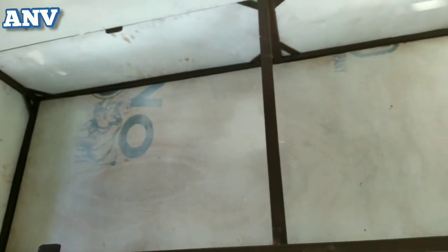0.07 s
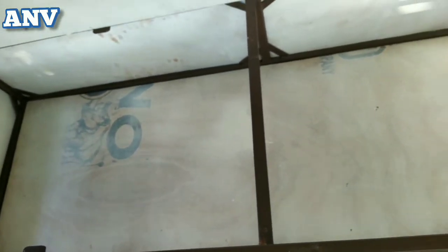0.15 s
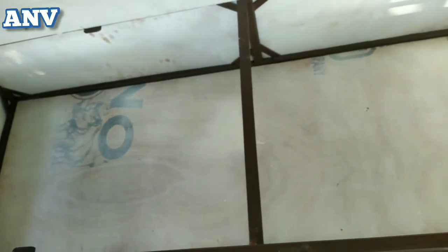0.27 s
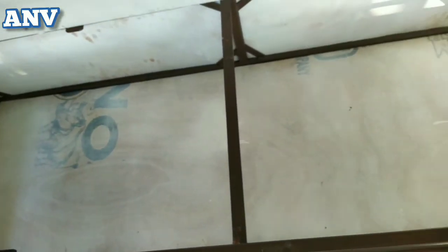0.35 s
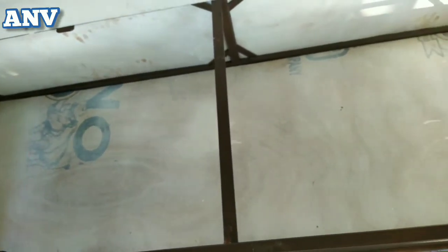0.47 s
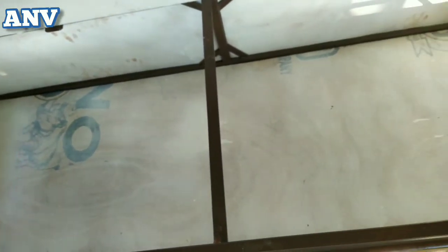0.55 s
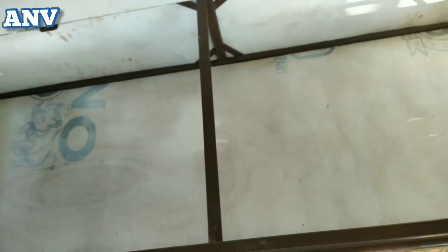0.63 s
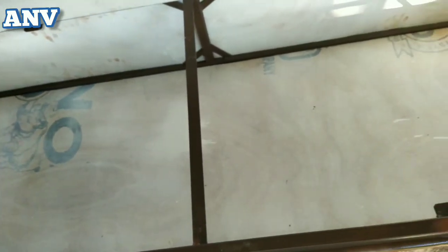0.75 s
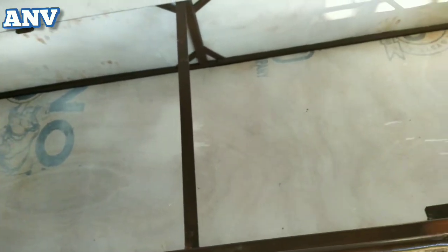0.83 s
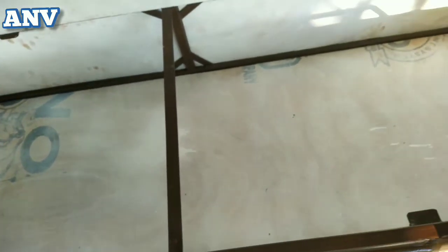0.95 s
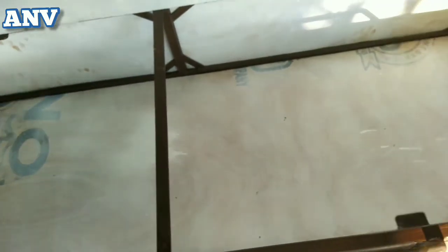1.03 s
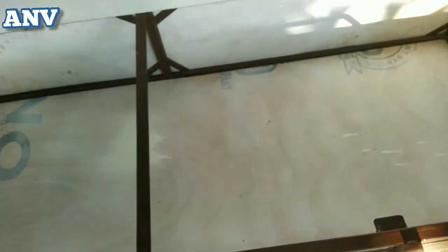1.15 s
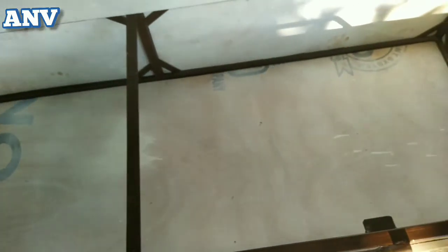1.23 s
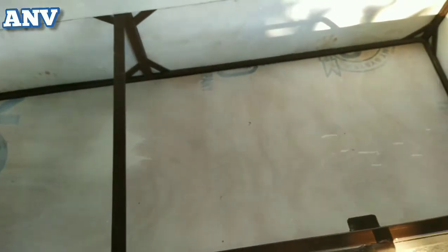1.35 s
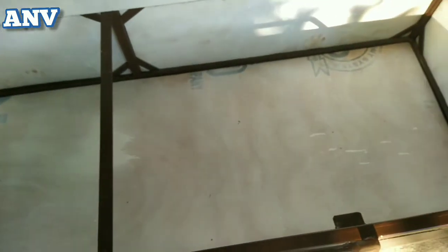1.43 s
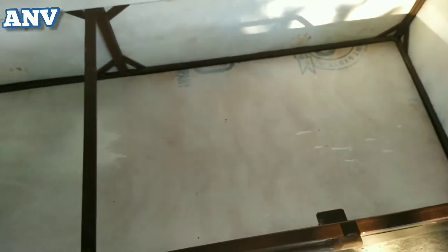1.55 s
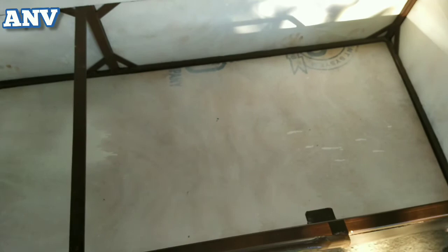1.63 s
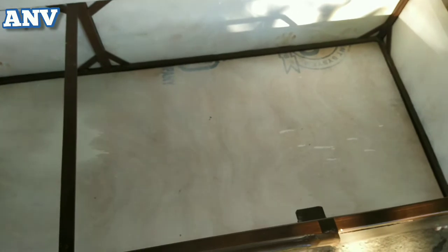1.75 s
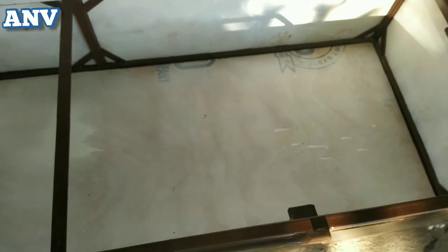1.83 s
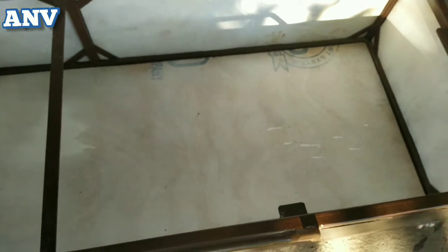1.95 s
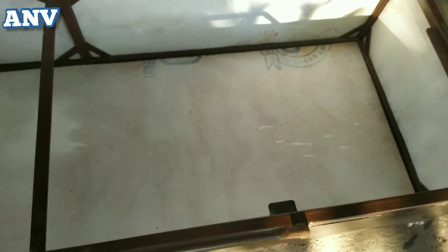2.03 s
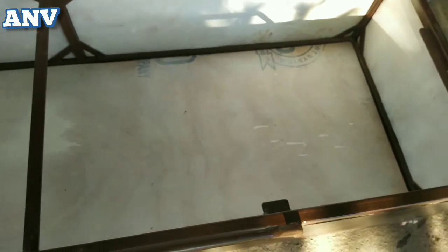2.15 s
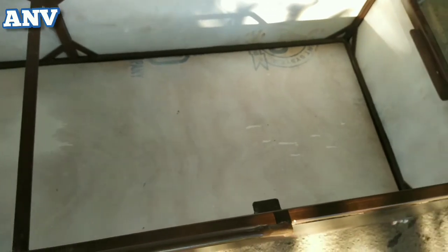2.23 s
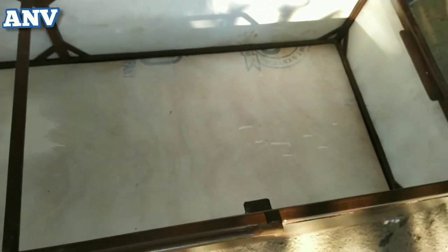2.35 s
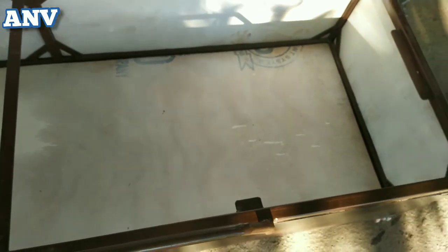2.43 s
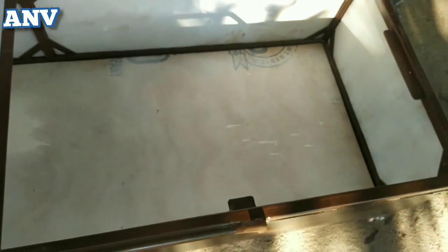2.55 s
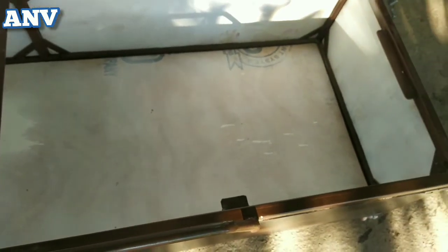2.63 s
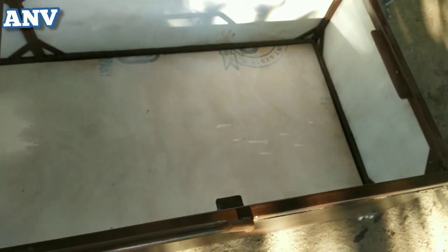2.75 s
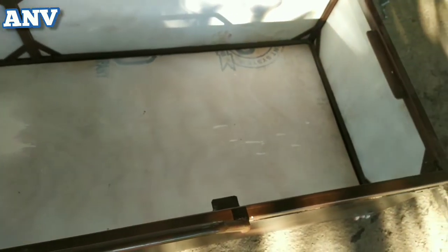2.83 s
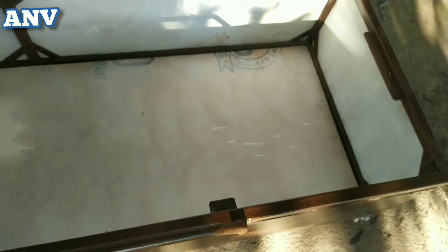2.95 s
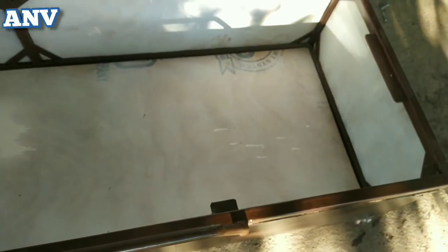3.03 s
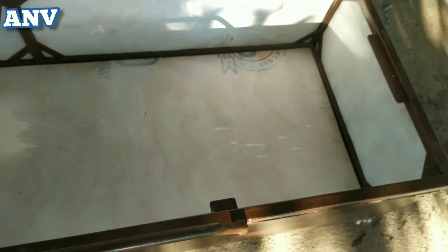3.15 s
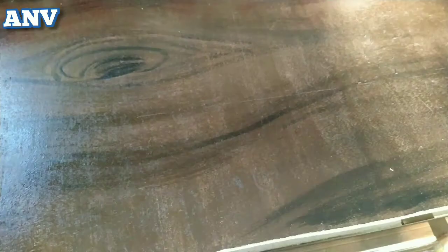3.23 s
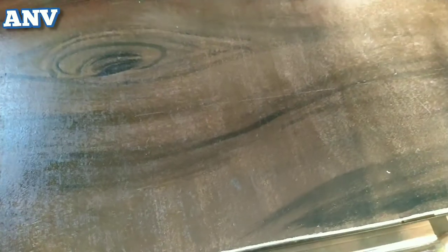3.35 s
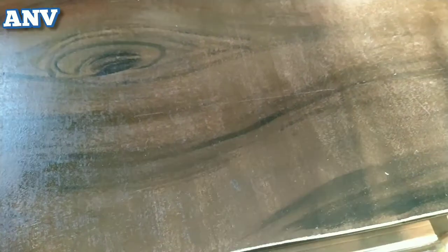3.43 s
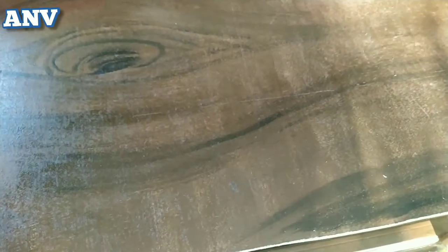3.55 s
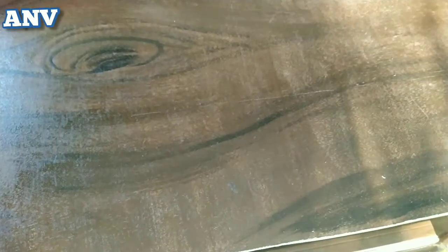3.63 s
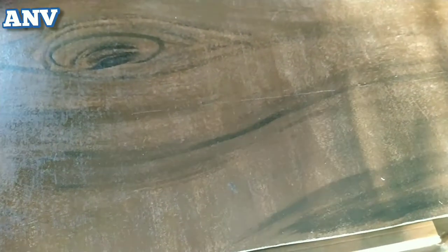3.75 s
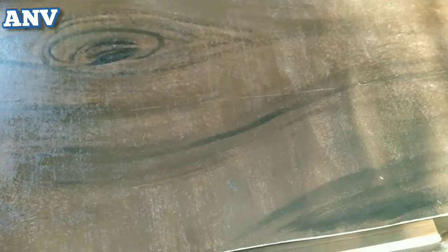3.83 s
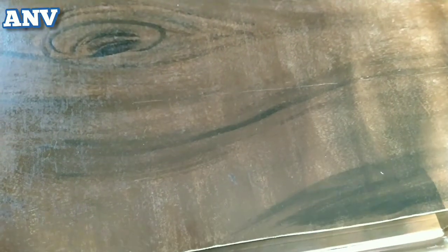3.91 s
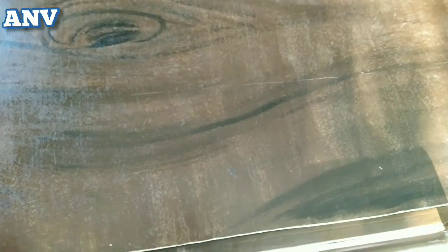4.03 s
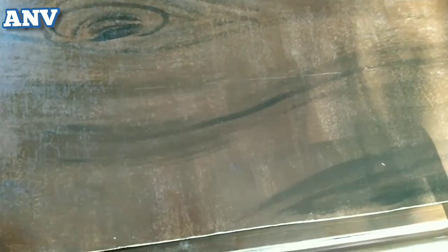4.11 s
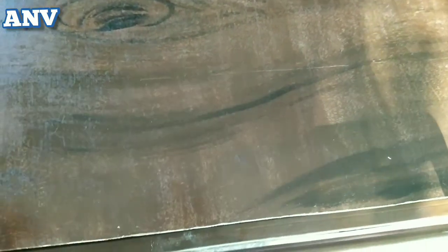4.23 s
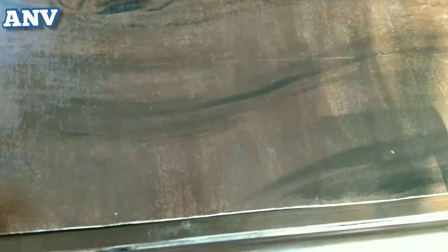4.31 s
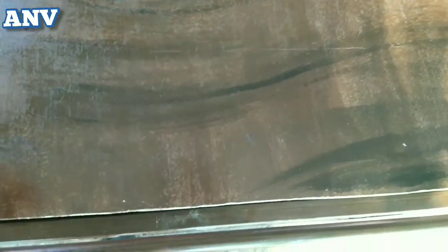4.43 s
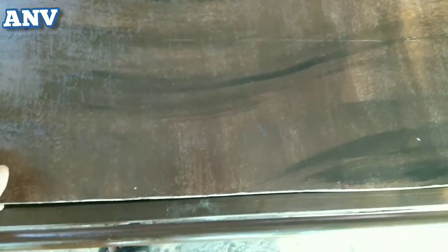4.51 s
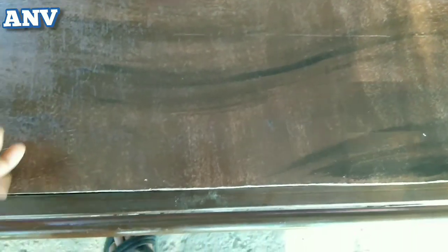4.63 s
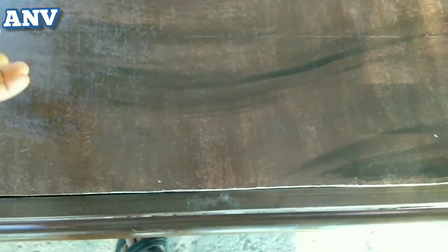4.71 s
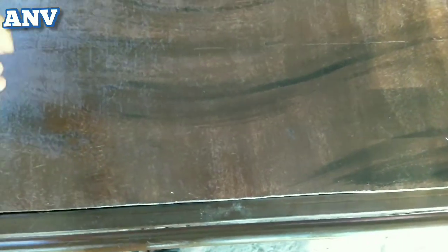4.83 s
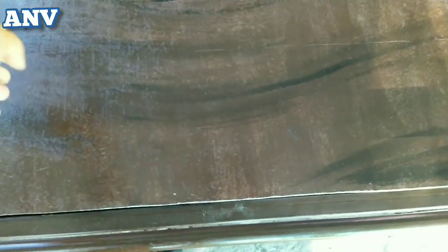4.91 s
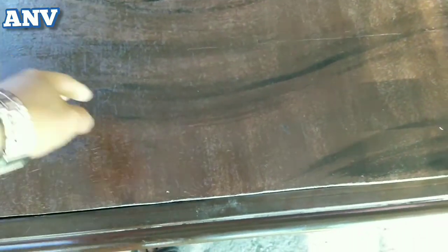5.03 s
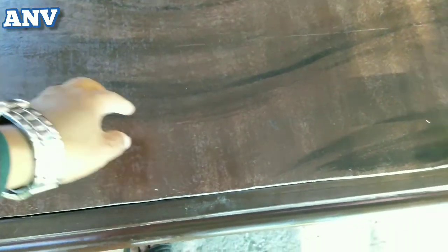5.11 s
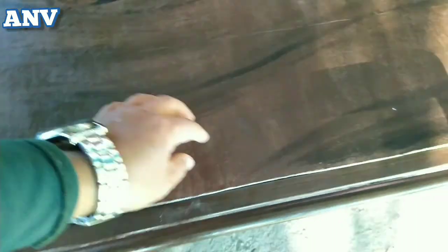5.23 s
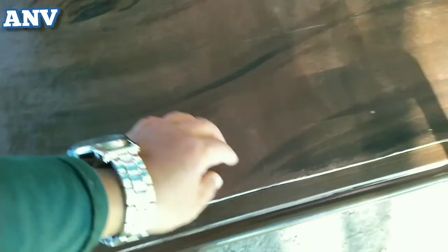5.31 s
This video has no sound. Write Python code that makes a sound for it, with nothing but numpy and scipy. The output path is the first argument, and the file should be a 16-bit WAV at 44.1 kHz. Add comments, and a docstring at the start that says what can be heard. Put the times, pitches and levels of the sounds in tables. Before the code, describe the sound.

Faint handling bumps and trilling crickets, then one loud boom as a plywood lid drops onto a rattling metal frame.

```python
"""Outdoors, far traffic rumbles, leaves hiss, crickets trill and far birds call throughout. From 1.2 s,
fingers bump the body of a hand-held camera. Near 4.2 s a hand takes hold of a heavy plywood lid. The lid
sweeps down, pushes out air and, just after 4.7 s, thumps on a steel-framed box: the wood booms, the
frame rattles and a metal strap ticks. At the end a hand and cuff slide onto the lid."""
import sys
import numpy as np
from scipy import signal
from scipy.fft import rfft, irfft, next_fast_len
from scipy.io import wavfile
from scipy.ndimage import uniform_filter1d, map_coordinates

SR = 44100
rng = np.random.default_rng(int(sys.argv[2]) if len(sys.argv) > 2 else 0)


def generate_wav(signal):
    """Clip the signal to [-1, 1] and save it as 16-bit WAV at the path in sys.argv[1]."""
    frames = np.transpose(np.atleast_2d(signal))
    scaled = np.clip(frames, -1, 1) * 32767
    pcm = np.round(scaled).astype(np.int16)
    wavfile.write(sys.argv[1], SR, pcm)


N = 236714

# how alike outdoor sound is on the left and right: f/Hz, likeness (1 = the same)
LIKENESS = [(60, 1), (150, 0.89), (360, 0.48), (880, 0.15), (2150, 0.25), (5260, 0.76), (12900, 0.19)]


def amp(db):
    """Turns decibels into a gain."""
    return 10 ** (np.asarray(db) / 20)


def unit(x):
    """Scales a signal to an average (rms) size of 1."""
    return x / np.sqrt(np.mean(x ** 2) + 1e-20)


def along(points, hz):
    """Reads between (f/Hz, value) points on a log frequency axis."""
    f, v = np.transpose(points)
    return np.interp(np.log(hz + 1), np.log(f + 1), v)


def wobble(rate):
    """A smooth random curve through `rate` new values a second."""
    values = rng.standard_normal(int(N * 400 / SR) + 4)
    return map_coordinates(values, [np.arange(N) * min(rate, 400) / SR])


def peak(s, db, rise, fall):
    """A level that climbs to db at time s, then sinks; rise and fall are in dB per second."""
    late = np.arange(N) / SR - s
    return db + np.where(late < 0, rise * late, -fall * late)


def filtered(x, response):
    """Shapes a sound by a gain and phase for each frequency."""
    m = next_fast_len(N + SR // 2)
    return irfft(rfft(x, m) * response(np.fft.rfftfreq(m, 1 / SR)), m)[..., :N]


def add(track, s, sound):
    """Mixes a sound in at time s."""
    start = max(round(s * SR), 0)
    track[start:start + len(sound)] += sound[:len(track) - start]


def pushes(rows):
    """One smooth push of force for each (t/s, impulse/dB, contact/ms)."""
    force = np.zeros(N)
    for s, db, contact_ms in rows:
        push = np.hanning(round(contact_ms * SR / 1000) + 3)
        add(force, s, amp(db) * push / push.sum())
    return force


def ringing(modes, hz, sides=False):
    """Adds up an object's resonances; with sides, they lean left and right in turn."""
    return sum((-1) ** (k * sides) * amp(db) * 1j * hz * width / (centre**2 - hz**2 + 1j * hz * width)
               for k, (centre, width, db) in enumerate(modes))


def rush(spectrum, likeness, patchy_db):
    """Stereo rushing noise with random louder and softer patches."""
    cells = signal.stft(rng.standard_normal((2, N)), nperseg=512)[2]
    patches = uniform_filter1d(rng.standard_normal(cells.shape[1:]), size=6, axis=0)
    patches = uniform_filter1d(patches, size=12, axis=1)
    pair = signal.istft(cells * amp(patchy_db * unit(patches)), nperseg=512)[1][:, :N]
    turn = lambda hz: np.arccos(np.clip(along(likeness, hz), -1, 1)) / 2
    mid, side = filtered(pair, lambda f: amp(along(spectrum, f)) * [np.cos(turn(f)), np.sin(turn(f))])
    return unit(np.array([mid + side, mid - side]))


def echoes(x):
    """The yard scatters sound back; each frequency dies away at its own speed."""
    # how long the yard rings: f/Hz, time to fade by 60 dB/s
    fade_times = [(200, 0.27), (2000, 0.53), (10000, 0.3)]
    hz, t, cells = signal.stft(rng.standard_normal((2, SR // 2)), SR, nperseg=256)
    turn = np.arccos(np.clip(along(LIKENESS, hz), -1, 1)) / 2
    cells = cells * np.array([np.cos(turn), np.sin(turn)])[..., None]
    mid, side = signal.istft(cells * amp(-60 * t / along(fade_times, hz)[:, None]), SR, nperseg=256)[1]
    tail = np.array([mid + side, mid - side])
    return signal.fftconvolve(np.pad(x, (400, 0))[None], tail / np.linalg.norm(tail[0]), axes=1)[:, :N]


def background():
    """Far traffic, a blurred insect chorus, leaves and a broad hiss, each a wavering noise."""
    # loudness over time: t/s, traffic level/dB, chorus level/dB, leaf level/dB
    levels = [(0.0, -55, -50.5, -58), (0.56, -56, -55.5, -64.5), (1.49, -57, -54.5, -64.5),
              (2.17, -57.5, -55, -61.5), (2.48, -53.5, -53.5, -64.5), (2.98, -56.5, -55.5, -64),
              (3.6, -56, -53, -67), (4.07, -57.5, -55.5, -66), (4.24, -56.5, -52, -57.5),
              (4.55, -56.5, -55, -62.5)]
    # the tone colour of each noise: f/Hz, level/dB
    traffic_colour = [(13, -59), (22, -13), (54, 3.5), (91, -4.5), (118, -6.5), (300, -26.5), (390, -70),
                      (660, -120)]
    chorus_colour = [(3500, -11), (4500, -7), (4750, 0.5), (5300, 2), (5800, 1), (6050, -4.5), (7000, -9.5),
                     (9500, -29.5)]
    leaf_colour = [(1800, -12), (2800, -16.5), (3500, 4.5), (4400, 4), (6500, -7.5), (9000, -2.5),
                   (11000, -43)]
    hiss_colour = [(100, -4), (250, 0.5), (380, 2), (600, -3), (900, -1.5), (1500, -11.5), (2500, -11.5),
                   (3400, -15.5), (7500, -9.5), (9500, -14), (11000, -40), (13400, -40)]
    times, *columns = np.transpose(levels)
    traffic_db, chorus_db, leaf_db = [np.interp(np.arange(N) / SR, times, db) for db in columns]
    traffic = amp(traffic_db + 1.5 * wobble(9)) * rush(traffic_colour, LIKENESS, patchy_db=1.5)
    chorus = amp(chorus_db + .4 * wobble(8)) * rush(chorus_colour, LIKENESS, patchy_db=.6)
    leaves = amp(leaf_db + 1.7 * wobble(7)) * rush(leaf_colour, LIKENESS, patchy_db=1.0)
    hiss = amp(-61.5 + 1.2 * wobble(2.66)) * rush(hiss_colour, LIKENESS, patchy_db=2.5)
    return traffic + chorus + leaves + hiss


def far_notes(rows, rough):
    """Short gliding notes with echoes; rough is the share by which their pitch wavers."""
    direct, waver = np.zeros(N), wobble(390)
    for s, length, from_hz, to_hz, db in rows:
        progress = np.linspace(0, 1, round(length * SR))
        glide_hz = from_hz + (to_hz - from_hz) * progress
        hz = glide_hz * (1 + rough * waver[round(s * SR):][:len(progress)])
        swell = np.sin(np.pi * progress) ** .4
        add(direct, s, amp(db) * swell * np.sin(2 * np.pi * np.cumsum(hz) / SR))
    return direct * amp(3 * wobble(98)) + amp(-1.5) * echoes(direct)


def birds_and_hums():
    """Far birds call and faint low hums come and go; the last low note, near 160 Hz from 5.05 s, is the lid
    still ringing."""
    # single notes: t/s, length/s, start f/Hz, end f/Hz, level/dB
    bird_notes = [(.37, 0.048, 3350, 3330, -60.5), (0.644, 0.032, 3280, 3350, -56.5),
                  (1.286, 0.088, 2486, 2360, -61.5), (1.603, 0.1, 4850, 3830, -57),
                  (1.663, 0.041, 3550, 3250, -50.5), (1.677, 0.051, 3130, 2960, -54),
                  (1.72, 0.074, 2800, 2414, -62), (2.14, 0.067, 2906, 2720, -51.5),
                  (2.186, 0.088, 2535, 2260, -63), (2.24, 0.073, 3090, 3130, -58),
                  (2.251, 0.08, 1875, 2010, -66.5), (2.614, 0.049, 3300, 3350, -52.5),
                  (3.029, 0.06, 2450, 2220, -62), (3.731, 0.062, 2800, 2694, -57),
                  (4.123, 0.097, 1766, 1960, -58.5)]
    hum_notes = [(0, 0.1, 399, 355, -61.5), (0.179, 0.1, 932, 931, -60), (0.231, 0.2, 380, 374, -63.5),
                 (2.979, 0.14, 120, 126, -53.5), (3.286, 0.087, 1065, 942, -60.5),
                 (5.05, 0.18, 157.2, 166.1, -50.5)]
    return far_notes(bird_notes, rough=.03) + far_notes(hum_notes, rough=.07)


def wing_song(calls, hz, strokes_per_s, drift_hz, depth, swell_db_per_s):
    """A cricket's wing tone pulses with each stroke and grows over each call; echoes fill the gaps."""
    t = np.arange(N) / SR
    level, lag = np.zeros(N), 0.11 * wobble(3.46)
    for start, end, db in calls:
        gate = np.clip(np.minimum(t - start, end - t) / 0.021, 0, 1)
        stroke = np.sin(np.pi * (strokes_per_s * (t - start) + lag)) ** 4
        swell = amp(db + swell_db_per_s * (t - (start + end) / 2))
        level += swell * gate * (1 - depth + 2.78 * depth * stroke)
    tone = np.sin(2 * np.pi * np.cumsum(hz + drift_hz * wobble(120)) / SR)
    direct = np.sqrt(2) * level * amp(2.8 * wobble(55)) * tone
    return direct * amp([[.5], [-.5]]) + amp(-5) * echoes(direct)


def crickets():
    """A near cricket trills, and a second, higher one chirps."""
    # each cricket's calls: start t/s, end t/s, level/dB
    trills = [(0, .13, -58), (.57, .82, -60), (.86, 1.44, -60.5), (1.74, 2.53, -57.5), (2.9, 3.9, -59.5),
              (4.42, 4.68, -60.5), (4.9, 5.24, -56.5)]
    chirps = [(3.42, 3.55, -70), (3.64, 3.8, -64), (3.88, 4.05, -62.5), (4.1, 4.25, -62), (4.35, 4.53, -60),
              (4.97, 5.15, -62.5), (5.2, 5.33, -57)]
    near = wing_song(trills, hz=6427, strokes_per_s=27.4, drift_hz=33.4, depth=0.46, swell_db_per_s=6)
    high = wing_song(chirps, hz=6780, strokes_per_s=29.7, drift_hz=72.3, depth=0.27, swell_db_per_s=12)
    return near + high


def finger_bumps():
    """Each bump pushes the camera body, which rings briefly; skin scuffs just before and after."""
    # finger contacts: t/s, peak force/dB, contact/ms
    touches = [(1.238, -42, 5.3), (1.291, -40, 6.2), (1.327, -37, 5.5), (1.362, -37, 3.5),
               (1.706, -40.5, 3.5), (1.733, -33.5, 3.5), (1.757, -35.5, 11.8), (1.81, -40, 4.4),
               (1.877, -38.5, 3.5), (1.907, -40.5, 3), (2.459, -36, 4), (2.462, -25, 0.47),
               (2.493, -29.5, 2.8), (2.596, -37, 0.39), (2.599, -32.5, 2.15), (2.623, -43, 1.3),
               (2.635, -34, 3.6), (3.122, -33.5, 3.8), (3.131, -36, 1.85), (3.135, -36, 2.3),
               (3.141, -33.5, 1.56), (3.16, -34.5, 3.7), (3.191, -42, 0.39), (3.194, -34, 2.7),
               (3.213, -34.5, 1.75), (3.385, -41, 3.3), (3.42, -42, 4.4)]
    # resonances of the camera body in the hand: f/Hz, width/Hz, level/dB
    body_modes = [(69.4, 25, 7), (121, 32, 3.5), (195, 33, 0.5), (348, 200, -6), (500, 71, 0),
                  (930, 770, -0.5), (2600, 1500, -19)]
    impulses = [(s, db + 20 * np.log10(ms * SR / 2000), ms) for s, db, ms in touches]
    drag = sum(amp(peak(s, db - 18.5, rise=625, fall=625)) for s, db, ms in touches)
    scuff = drag * amp(2.9 * wobble(200)) * rng.standard_normal(N)
    return filtered(pushes(impulses) + scuff, lambda f: ringing(body_modes, f) / (1 + 1j * f / 4000) ** 2)


def metal_ticks():
    """The latch and strap tick: a main ring, two higher ones and a spit of noise."""
    # small metal hits: t/s, level/dB, f/Hz, higher rings and noise against the main ring/dB
    hits = [(4.2198, -25, 3740, -15), (4.7455, 3, 3390, -18), (4.7595, -13, 3000, -19),
            (4.7752, -8, 3410, -0.5), (4.791, -17, 3320, 1.5), (4.796, -14, 4600, -12),
            (4.826, -15, 3270, -6), (4.839, -25, 4220, 7), (4.875, -24, 3600, -21), (5.035, -31, 3850, -8),
            (5.2563, -29, 3650, 0.5), (5.3295, -18, 5600, -12), (5.3335, -17, 5970, -17),
            (5.3413, -7, 3230, -4)]
    fade_s = 0.0061  # to fall by 60 dB
    track, t = np.zeros(N), np.arange(SR // 20) / SR
    attack = (1 - np.exp(-t / 0.00029)) ** 2
    for s, db, hz, upper_db in hits:
        phase = 2 * np.pi * hz * t
        upper = 0.7 * np.sin(1.275 * phase) + np.sin(1.65 * phase) + 0.38 * rng.standard_normal(len(t))
        add(track, s, amp(db - 60 * t / fade_s) * attack * (np.sin(phase) + amp(upper_db) * upper))
    return filtered(track, lambda f: 1j * f / (900 + 1j * f) / (1 + (f / 7000) ** 4))


def air_and_cloth(shut_s):
    """Air jets out of the closing gap; a cuff rustles before and after."""
    # tone colour of the hiss: f/Hz, level/dB
    colour = [(500, -25), (1000, -2), (2000, 2), (2600, 1.5), (4000, 11.5), (5500, 4), (8200, 1),
              (10500, -12.5), (13000, -20)]
    grip = peak(4.185, -53.5, rise=700, fall=140)  # the hand takes hold
    jet = peak(shut_s, -24.5, rise=320, fall=360)
    puff = peak(4.848, -38, rise=150, fall=700)  # the lid settles after its bounce
    slide = peak(5.333, -50, rise=700, fall=60)  # hand and cuff slide onto the lid
    level_db = np.max([grip, jet, puff, slide], axis=0) + 1.4 * wobble(130)
    return amp(level_db) * rush(colour, likeness=[(1000, 0.21), (4000, 0.9), (9000, 0.4)], patchy_db=4.5)


def shaking(shut_s):
    """Levels in dB of panel and frame: the lid creaks on its way down, shakes hard, then settles."""
    full_s, full_db = shut_s + 0.028, -16
    speeding_up = peak(shut_s - 0.057, -34, rise=370, fall=-370)  # climbs all the way
    creak = np.minimum(speeding_up, peak(shut_s, -26.5, rise=135, fall=360))
    settling = peak(full_s + .14, 0, rise=0, fall=57.4)  # the shake dies faster from here
    shake = np.maximum(creak, peak(full_s, full_db, rise=550, fall=91.6) + settling)
    box_hum = peak(full_s, -52, rise=800, fall=45)
    rattle = -26 + 1.55 * (shake - full_db)  # the steel's level swings wider than the panel's
    return np.maximum(shake, box_hum), rattle


def lid_slam(shut_s):
    """Knocks and a chatter of tiny contacts ring the plywood lid, while the steel frame rattles."""
    # fingers taking hold, then the blow on the frame and its bounces: t/s, impulse/dB, contact/ms
    knocks = [(4.289, 1.5, 3.4), (4.313, 0, 3.3), (4.326, 0, 2.9), (4.34, 0.5, 3.5), (4.7261, 35, 1.3),
              (4.7312, 31, 0.17), (4.769, 18.5, 1.1), (4.7911, 24, 6.1), (4.807, 21, 2.6),
              (4.827, 27.5, 1.2), (4.841, 21, 2.2)]
    # resonances of the lid and box, and of the steel frame: f/Hz, width/Hz, level/dB
    wood_modes = [(63.4, 27, -14), (92, 18, 6), (114.1, 4.8, 8.5), (161.7, 14.5, 7.5), (201.6, 22, -5),
                  (250, 63, -0.5), (335, 9.8, 1), (395.6, 15, -5.5), (503, 12, -38), (599.5, 28, -8.5),
                  (693, 43, -9.5), (797, 27, -4.5), (806, 10, -12), (1040, 39, -54), (1110, 14, -47),
                  (1240, 19, -32), (1530, 75, -55), (1614, 27, -17.5)]
    steel_modes = [(2980, 440, -1.5), (3536, 220, 6.5), (3900, 190, 4), (4020, 130, 6), (4870, 710, -5),
                   (5500, 270, -24), (6670, 220, -6.5)]
    shake_db, rattle_db = shaking(shut_s)
    soft = lambda f: 1 / (1 + 1j * f / 1500 - (f / 1900) ** 2)  # wood on steel pads is a soft contact
    sharp = rng.standard_normal(N) * amp(2.6 * wobble(150))
    dull = filtered(sharp, lambda f: 1 / (1 + 1j * f / 450) ** 2)
    chatter = dull + (sharp - dull) * np.clip(amp(0.32 * (shake_db + 16)), 0, 1)  # weaker is duller
    chatter /= np.std(filtered(chatter, lambda f: ringing(wood_modes, f)))
    force = pushes(knocks) + amp(shake_db) * chatter
    wood = filtered(force, lambda f: soft(f) * ringing(wood_modes, f))
    # sound from the wide panel reaches left and right at different times; short waves differ most
    apart = lambda f: amp(5.5) * 1j * np.sin(np.minimum(f / 1100, np.pi / 2)) ** 1.93
    wood_side = filtered(force, lambda f: soft(f) * ringing(wood_modes, f, sides=True) * apart(f))
    jingle = rng.standard_normal((2, N)) * amp(rattle_db + 4.4 * wobble(200))
    frame = lambda f: amp(12) * ringing(steel_modes, f, sides=True) / (1 + (f / 8000) ** 4)
    steel, steel_side = filtered(jingle, frame)
    return wood + steel, (wood_side + 0.15 * steel_side) * [[1], [-1]]  # centre, left-right part


def scene():
    """All the sources together; the box and its metal parts echo a little in the yard."""
    shut_s = 4.716
    box, box_sides = lid_slam(shut_s)
    air = air_and_cloth(shut_s)
    near = box + metal_ticks()
    calls = crickets() + birds_and_hums()
    return near + box_sides + air + amp(-11) * echoes(near) + finger_bumps() + calls + background()


def record(dry):
    """The microphone drops the deepest bass, rounds off the highest peaks and cuts the top treble."""
    thin = filtered(dry, lambda hz: (1j * hz / (30 + 1j * hz)) ** 2)
    rounded = thin / (1 + np.abs(thin / .95) ** 4) ** (1 / 4)
    return filtered(rounded, lambda hz: hz < 13100)


dry = scene()
out = record(dry)
generate_wav(out)
```